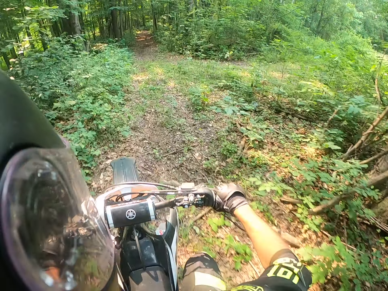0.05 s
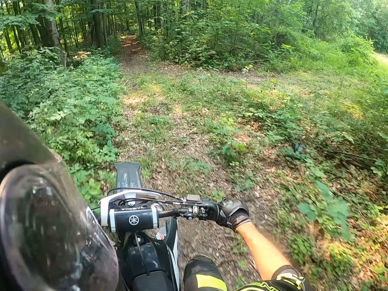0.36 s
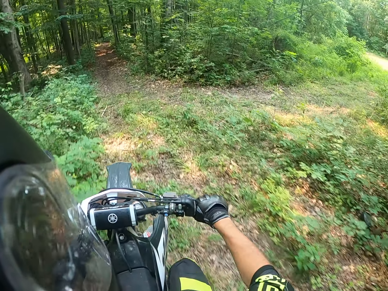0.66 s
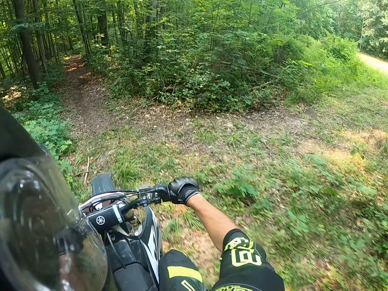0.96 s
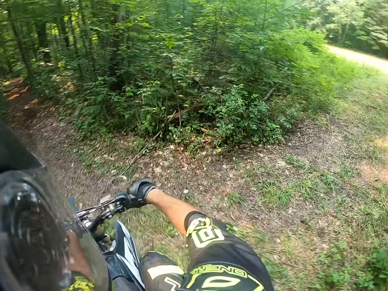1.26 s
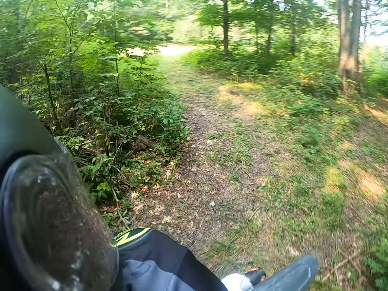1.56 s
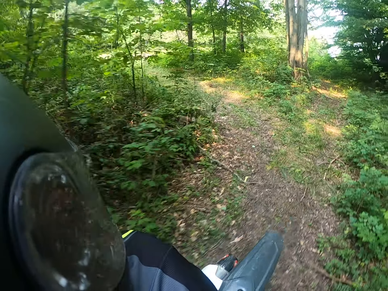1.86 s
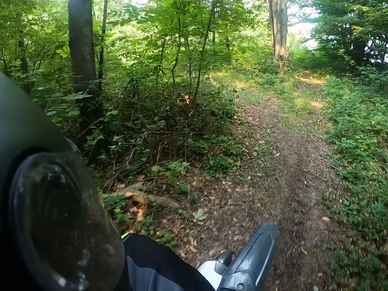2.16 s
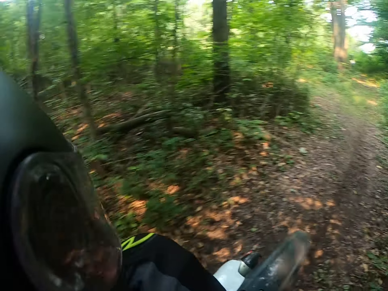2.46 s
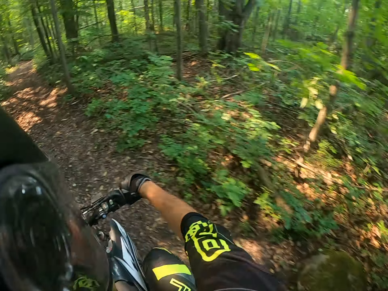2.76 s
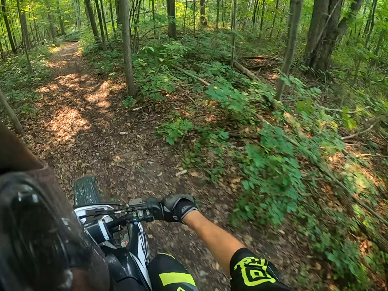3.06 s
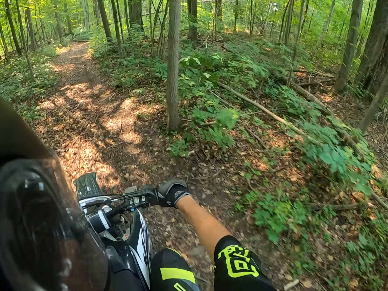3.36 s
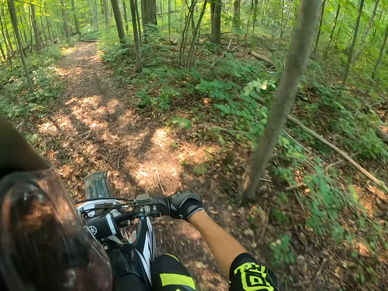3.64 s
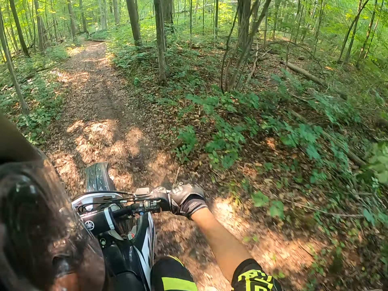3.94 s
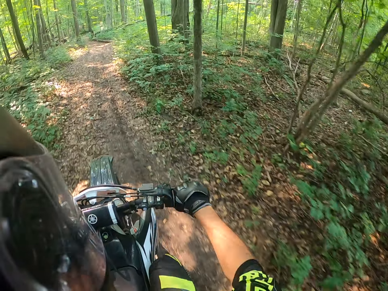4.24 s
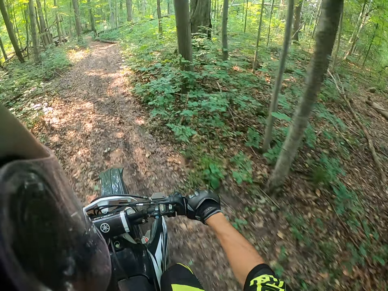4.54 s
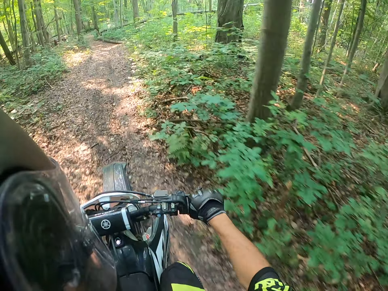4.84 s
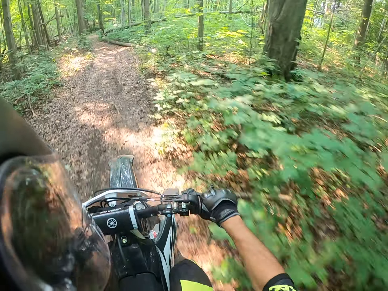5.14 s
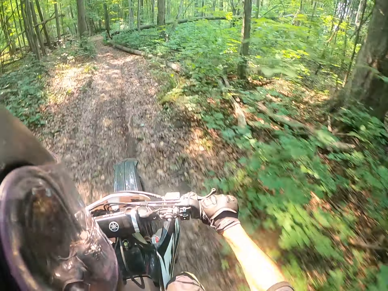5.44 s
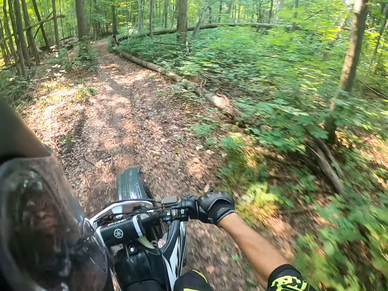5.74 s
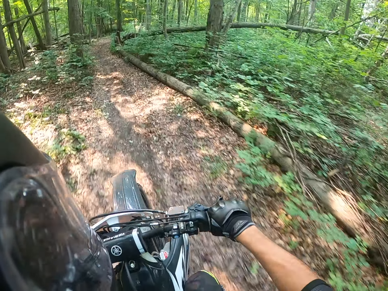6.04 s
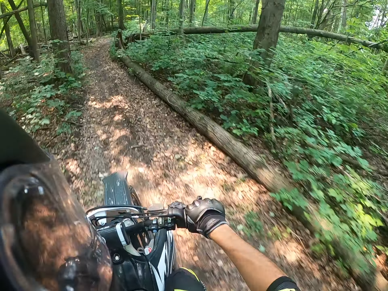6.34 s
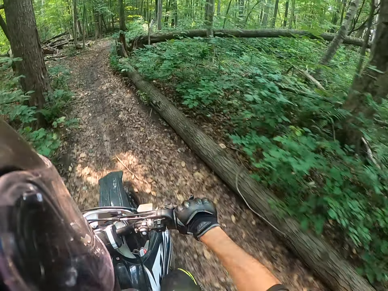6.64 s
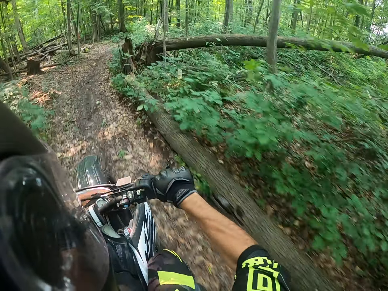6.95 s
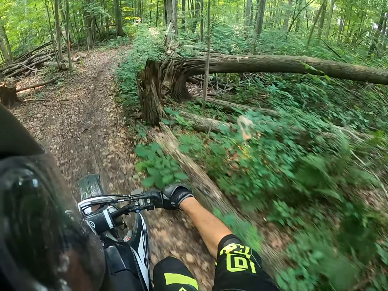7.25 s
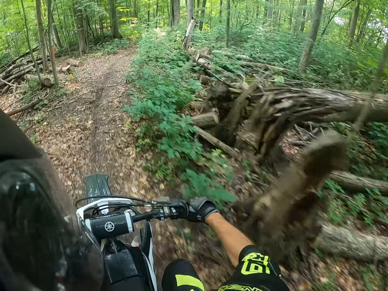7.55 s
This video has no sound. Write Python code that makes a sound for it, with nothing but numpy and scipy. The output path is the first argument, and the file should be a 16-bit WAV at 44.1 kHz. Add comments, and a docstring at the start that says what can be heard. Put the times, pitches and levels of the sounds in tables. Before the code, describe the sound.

A dirt bike engine pulls, drops to a lumpy idle, then revs up twice more, with knocks from a bumpy forest trail.

```python
"""A dirt bike on a forest trail

From the rider's helmet we hear a one-cylinder four-stroke engine pull, drop to a lumpy idle, then pull
twice more. Each firing thumps down the exhaust pipe and barks in the silencer. The engine clatters,
bumps knock the frame, gears whine, tyres crush leaves and slow air buffets the microphone."""
import sys
import numpy as np
from scipy import signal
from scipy.fft import rfft, irfft
from scipy.io import wavfile
from scipy.ndimage import uniform_filter1d

SR = 44100
rng = np.random.default_rng(int(sys.argv[2]) if len(sys.argv) > 2 else 0)


def file_out(sig):
    """Save sig as 16-bit WAV at sys.argv[1]."""
    # one column per channel
    cols = np.atleast_2d(sig).T
    # limit, then scale
    lim = np.clip(cols, -1, 1)
    pcm = np.round(lim * 32767).astype(np.int16)
    wavfile.write(sys.argv[1], SR, pcm)


N = 343980
RING = 4096  # samples in one short ringing sound
IDLE_HZ, MID_HZ = 18.5, 38  # firings a second: the top of idle, and mid speed
# Each time the rider opens the throttle: open_s, shut_s, extra_bark_db, thump_after_shut_db
PULLS = [(-0.03, 1.331, 0, 4.5), (3.647, 5.712, 2, -6), (6.723, 7.324, 1.5, -3)]


def undb(db):
    """Turn decibels into a gain."""
    return 10 ** (np.asarray(db) / 20)


def unit(x):
    """Scale a sound to an average power of 1."""
    return x / np.sqrt(np.mean(x ** 2))


def curves(table):
    """Join rows that start with a time into curves, one value per sample."""
    s, *columns = np.transpose(table)
    return [np.interp(np.arange(N) / SR, s, c) for c in columns]


def response(points, stretch=1):
    """A click of energy 1 with the tone of (pitch_hz, level_db) points; stretch raises its pitch."""
    hz, db = np.transpose(points)
    f = np.maximum(np.arange(RING // 2 + 1) * SR / RING, 1)
    gains = undb(np.interp(np.log(f), np.log(hz * stretch), db))
    cepstrum = irfft(np.log(gains))
    cepstrum[1:RING // 2] *= 2  # this fold packs the energy at the start
    cepstrum[RING // 2 + 1:] = 0
    h = irfft(np.exp(rfft(cepstrum)))
    return h / np.linalg.norm(h)


def ring(modes):
    """Fading tones from (pitch_hz, width_hz, level_db) rows; wider ones die sooner."""
    t = np.arange(RING) / SR
    h = sum(undb(db) * width * np.exp(-np.pi * width * t) * np.sin(2 * np.pi * hz * t)
            for hz, width, db in modes)
    return h / np.linalg.norm(h)


def through(x, h):
    """Let the sound x set off the ringing h."""
    return signal.oaconvolve(x, h)[:len(x)]


def soften(x, hz):
    """Dull a sound by turning down the treble above hz."""
    return signal.sosfilt(signal.butter(2, min(hz, SR / 4), fs=SR, output="sos"), x)


def walk(rate):
    """A random drift of size about 1, with rate turns a second."""
    size = int(SR / rate)
    steps = np.repeat(rng.standard_normal(N // size + 1), size)
    return unit(uniform_filter1d(steps, size)[:N])


def add(out, at, sound):
    """Mix a sound in, starting at a sample."""
    out[at:at + len(sound)] += sound[:max(N - at, 0)]


def burst(decay_s):
    """A dying puff of noise."""
    return rng.standard_normal(RING) * np.exp(-np.arange(RING) / SR / decay_s)


def wrist(open_s=0.13, shut_s=0.031, twist_db=3, twist_s=0.23):
    """The rider opens the throttle (0 to 1), swells the bark with a last twist, then snaps it shut."""
    t = np.arange(N) / SR
    opening, extra_db = np.zeros(N), np.zeros(N)
    for opens, shuts, db, _ in PULLS:
        grip = np.clip((t - opens) / open_s, 0, 1) * np.clip(1 - (t - shuts) / shut_s, 0, 1)
        opening += grip
        extra_db += grip * (db + twist_db * np.exp(-((t - shuts) / twist_s) ** 2))
    return opening, extra_db


def loudness(law, hz, opening):
    """A level in dB that follows engine speed; the throttle blends from coasting to pulling."""
    coasting, pulling = (db + slope * np.log2(hz / MID_HZ) for db, slope in law)
    return coasting + opening * (pulling - coasting)


def rev_dip(hz):
    """The bark dips a little while the engine gains speed, in dB."""
    octaves_per_s = uniform_filter1d(np.gradient(np.log2(hz)) * SR, size=SR // 10)
    return -0.97 * np.clip(octaves_per_s, 0, 2)


def down_pipe(h, reflection, echo_s):
    """The open end of a pipe sends each pulse back upside down."""
    h = h - reflection * np.pad(h, (int(echo_s * SR), 0))[:len(h)]
    return h / np.linalg.norm(h)


def exhaust(firings, hz, db, throttle, stumble_s=2.86, miss_db=-17, scatter_db=0.37, lag_s=0.00029):
    """Each firing thumps down the pipe: shorter at speed, duller with the throttle shut."""
    # The tone of one puff from the exhaust valve: pitch_hz, level_db
    puff_tone = [(30, -15), (70, -6.5), (102, -18), (135, 1), (195, 3), (235, 3.5), (290, 3), (380, 3),
                 (470, -5), (570, -5), (700, -20.5), (1000, -6), (1400, -16), (2100, -52)]
    out = np.zeros(N)
    for k, (at, chance) in enumerate(zip(firings, rng.standard_normal(len(firings)))):
        if hz[at] < IDLE_HZ:
            # every second firing all but fails; the pattern slips once, at the stumble
            missed = (k + int(at / SR > stumble_s)) % 2
            thump = idle_putt(chance) * undb(miss_db * missed)
        else:
            speed = max(hz[at], 26 * throttle[at]) / 36  # an open throttle limits the puff's length
            shut = 1 - throttle[at]
            stretch = speed ** (0.29 + 0.39 * shut) * (1 - 0.1 * shut)
            puff = soften(response(puff_tone, stretch), 470 * speed + 2200 * throttle[at] ** 2)
            # hotter gas at speed brings the echo back sooner
            thump = down_pipe(puff, reflection=0.87, echo_s=0.003114 / speed ** 0.19)
        gain = np.sqrt(SR / hz[at]) * undb(db[at] + scatter_db * chance)
        add(out, at + int(lag_s * SR), thump * gain)  # just behind the bark
    # the exhaust chamber delays the lows, so each pop sweeps downward
    return out - 2 * signal.lfilter(*signal.iirpeak(230, 1, fs=SR), out)


def bark(firings, hz, cycle, db, push_db, throttle, scatter_db=1.4, jitter_s=0.00005):
    """With the throttle open, each firing strikes the silencer and a rush of gas follows."""
    # The silencer's ringing tones: pitch_hz, width_hz, level_db
    silencer_tones = [(1084, 27.2, 4.5), (1335, 40, -3.5), (1367, 65, -13.5), (1676, 13, -21),
                      (3060, 59, -22.5), (3290, 120, -23.5)]
    # The tone of rushing gas: pitch_hz, level_db
    gas_tone = [(120, -25), (200, -25.5), (330, -26.5), (490, -22.5), (640, -28), (900, -7.5),
                (1000, -14.5), (1075, -15), (1200, -9), (1345, 5.5), (1540, -22), (1680, 1.5), (1850, -5),
                (2050, -35), (4000, -61)]

    def piped(pitch_hz, width_hz):
        """One softened tone with its echo in the pipe."""
        return down_pipe(soften(ring([(pitch_hz, width_hz, 0)]), 1500), reflection=0.48, echo_s=0.003367)

    strength, lateness = rng.standard_normal((len(firings), 2)).T
    starts = np.clip(firings + np.round(lateness * jitter_s * SR).astype(int), 0, N - 1)
    blows = np.zeros(N)
    blows[starts] = np.sqrt(SR / hz[firings]) * undb(scatter_db * strength)
    drive = undb(db - 1)
    blows *= -throttle * drive
    lowest, *upper = (undb(level) * piped(pitch, width) for pitch, width, level in silencer_tones)
    # faster blows are sharper and ring the upper tones more
    out = through(blows, lowest) + through(blows * hz / MID_HZ, sum(upper))
    # a hard push sharpens the front of each bark
    out += through(blows * undb(-10 + 1.2 * push_db), piped(1190, 230))
    pulsing = unit(0.15 + np.exp(-cycle / 0.28))  # some gas still flows between firings
    rush = rng.standard_normal(N) * pulsing * undb(-6) * np.sqrt(throttle) * drive
    return out + soften(through(rush, response(gas_tone)), 5200)


def forest(x, echo_db=-6, decay_s=0.053, delay_s=0.00489):
    """Ground, trunks and the rider's body scatter each pulse into a short, dull tail."""
    tail = soften(np.pad(burst(decay_s), (int(delay_s * SR), 0)), 2700)
    # low sounds pass round the trunks
    tail = signal.sosfilt(signal.butter(4, 290, "high", fs=SR, output="sos"), tail)
    return x + through(x, tail) * undb(echo_db) / np.sqrt(decay_s * SR / 2)


def clatter(cycles, bark_db, clatter_db, throttle, grain_db=1.0, flicker_db=0.94):
    """Valves, gears and chain make many tiny taps that ring the engine's casing and cooling fins."""
    # The tone of the casing: pitch_hz, level_db
    casing_tone = [(60, -12), (150, -2), (310, -8), (490, -3), (660, -4.5), (980, -3), (1075, 12.5),
                   (1200, -8.5), (1360, 6), (1560, -8), (1700, -4.5), (1850, -6), (2100, -29), (3500, -55)]
    # The brighter tone of the fins: pitch_hz, level_db
    fin_tone = [(1200, 4), (2000, -4), (2390, -2), (2760, -10), (2930, -2.5), (3050, 3.5), (3170, -1),
                (3330, -0.5), (3550, -6), (3900, -11), (4300, -13.5), (4510, -5.5), (4800, -15.5),
                (6750, -20.5), (7800, -32.5), (9600, -28.5), (15000, -53)]
    bunch = 1 + 0.092 * np.cos(2 * np.pi * 2 * cycles - 1.5)  # the crank turns twice per firing
    casing_taps, fin_taps = (
        unit(rng.standard_normal(N) * bunch * undb(grain_db * walk(500) + flicker_db * walk(25)))
        for _ in range(2))
    share = np.sqrt(1 - 0.97 * throttle)  # the casing fades as the throttle opens
    casing = through(casing_taps * share * undb(bark_db - 1), response(casing_tone))
    fins = through(fin_taps * undb(clatter_db + 2), response(fin_tone))
    return soften(casing, 7800) + fins


def wind(flutter_hz=28, breeze_db=-39.5, sway_db=-2.5, eddy_db=-9):
    """Air hits the microphone: a swaying breeze, and gusts that swell into a low, wandering flutter."""
    # Gusts of air: middle_s, length_s, level_db
    gust_list = [(0.368, 0.19, -30), (1.54, 0.35, -32), (1.926, 0.29, -30.5), (2.326, 0.11, -31),
                 (2.59, 0.1, -27), (4.734, 0.22, -30.5), (5.422, 0.086, -31), (6.045, 0.17, -23)]
    # The tone of the wind's rumble: pitch_hz, level_db
    rumble_tone = [(10, -9), (20, 1), (28, 5), (37, -10.5), (60, -8), (110, -22), (300, -79.5)]
    t = np.arange(N) / SR
    gusts = np.sqrt(sum(undb(db) ** 2 * np.exp(-(2 * (t - s) / length) ** 2)
                        for s, length, db in gust_list))
    breeze = undb(breeze_db + sway_db * walk(4))
    pitch_hz = flutter_hz * (1 + 0.131 * walk(30))
    flutter = np.sqrt(2) * np.sin(2 * np.pi * np.cumsum(pitch_hz) / SR)
    rumble = through(rng.standard_normal(N), response(rumble_tone))
    return gusts * flutter + rumble * np.hypot(breeze, gusts * undb(eddy_db))


def run_on(fade_s=0.23):
    """Fuel left after the throttle shuts makes the thump briefly louder or softer, in dB."""
    t = np.arange(N) / SR
    return sum(db * (t > shuts) * np.exp(-((t - shuts) / fade_s) ** 2) for _, shuts, _, db in PULLS)


def knocks():
    """Bumps and chain snatches ring the frame, hard ones with a crack on top; the slack chain clinks on its
    guide."""
    # Hits on the frame: bumps in the trail, and from 1.57 to 1.69 s the chain snatching on each firing:
    # start_s, level_db, treble_db, sharpness_hz
    hits = [(1.532, -21, -2.5, 885), (1.57, -17.5, -14, 1300), (1.61, -17.5, -16, 1300),
            (1.65, -25, -8, 1300), (1.685, -17, -32, 1290), (1.986, -24, 12.5, 2600),
            (2.145, -30, -20, 1500), (2.776, -23, -30, 1500), (2.868, -20.5, -26, 625),
            (2.879, -23, -26, 524), (5.867, -18.5, -4, 2500), (5.891, -17.5, -21, 500),
            (5.913, -11.5, -29, 800), (5.987, -17, -25, 750), (6.038, -18, -27, 1200),
            (6.436, -14.5, -28, 1110)]
    # The frame's ringing tones: pitch_hz, width_hz, level_db
    frame_tones = [(570, 23, 10), (657, 14, 4.5), (840, 28, -5), (920, 14, 14), (1136, 26, 18),
                   (1230, 35, -1), (1550, 63, 10.5), (1660, 37, -1.5), (2370, 51, -4)]
    # The tone of a hard hit: pitch_hz, level_db
    crack_tone = [(500, -8), (1600, 0.5), (1950, -12), (2300, -8), (2900, -24), (3700, -5.5), (4400, -15.5),
                  (5200, -15), (6300, -18), (7500, -47), (12000, -34), (15000, -53)]
    # Slaps of the chain: start_s, level_db, pitch_hz
    chain_slaps = [(1.411, -28, 3550), (1.468, -31, 3620), (1.532, -42, 3700), (1.57, -37, 5000),
                   (1.647, -39, 5060), (1.78, -37, 3620), (1.81, -36, 3680), (1.859, -38, 3700),
                   (1.926, -42, 3650), (2.029, -39, 4100), (2.605, -33.5, 3600), (3.502, -36, 3680),
                   (5.872, -31, 3840)]
    out = np.zeros(N)
    for s, db, treble_db, sharpness_hz in hits:
        body = soften(ring(frame_tones), sharpness_hz)
        crack = through(burst(decay_s=0.0063), response(crack_tone))
        add(out, int(s * SR), body / abs(body).max() * undb(db))
        add(out, int(s * SR), crack / abs(crack).max() * undb(db + treble_db - 2))
    for s, db, hz in chain_slaps:
        slap = soften(through(burst(decay_s=0.0086), ring([(hz, 180, 0)])), 5000)
        add(out, int(s * SR), slap / abs(slap).max() * undb(db - 4))
    return out


def idle_putt(chance, detune=0.016, scatter_db=-1.2):
    """One idle firing rings the pipe; uneven burning shifts its pitch and level."""
    # The pipe's ringing tones at idle: pitch_hz, width_hz, level_db
    pipe_tones = [(154, 17, -9.5), (227, 25, 1.5), (410, 58, -11), (471, 19, -4.5), (616, 97, -13),
                  (806, 85, -13)]
    putt = ring([(hz * (1 + detune * chance), width, db) for hz, width, db in pipe_tones])
    return soften(putt, 510) * np.sqrt(2) * undb(scatter_db * chance)


def tyres(grain_db=4):
    """Dry leaves crackle under the knobbly tyres."""
    # How loud the leaves are: time_s, level_db
    leaf_levels = [(0, -72), (2.4, -61), (2.9, -56), (3.5, -55), (4.0, -50.5), (5.0, -53), (7.8, -75)]
    # Their tone: pitch_hz, level_db
    leaf_tone = [(2000, -5.5), (4000, -1), (5400, -3), (6800, -11.5), (8000, -26.5), (11000, -30.5),
                 (15000, -26)]
    db, = curves(leaf_levels)
    crackle = unit(rng.standard_normal(N) * undb(grain_db * walk(900)))
    return through(crackle * undb(db), response(leaf_tone))


def whine(table, width_hz):
    """A rough tone that follows (time_s, pitch_hz, level_db) rows and is silent outside them."""
    hz, db = curves(table)
    t = np.arange(N) / SR
    phase = 2 * np.pi * np.cumsum(hz) / SR
    sounding = (t > table[0][0]) & (t < table[-1][0])
    return sounding * undb(db) * (walk(width_hz) * np.cos(phase) + walk(width_hz) * np.sin(phase))


def rolling():
    """As the bike rolls at idle, the gears whine lower as it slows and a brake pad sings faintly."""
    # The gears' whine: time_s, pitch_hz, level_db
    gears = [(2.45, 1450, -67), (2.65, 1437, -53), (2.93, 1408, -47), (3.3, 1314, -51), (3.55, 1308, -46.5),
             (3.7, 1310, -58)]
    # The brake pad's note: time_s, pitch_hz, level_db
    brake = [(2.8, 3240, -68), (2.92, 3230, -55), (3.2, 3350, -65), (3.55, 3280, -73)]
    return whine(gears, width_hz=70) + whine(brake, width_hz=35)


def scene(idle_thump_db=-39, coast_flow=0.15):
    """Engine speed times the firings and sets their level; the throttle turns a burble into a bark."""
    # Engine speed: time_s, firings_per_s
    speed = [(0.0, 17.54), (0.12, 28.66), (0.44, 40.99), (0.81, 33.67), (1.03, 33.77), (1.35, 38.71),
             (1.66, 23.96), (2.08, 17.04), (3.64, 17.08), (4.02, 38.21), (4.43, 30.98), (4.76, 33.3),
             (4.86, 36.26), (5.43, 42.5), (5.64, 49.85), (5.71, 56.98), (5.87, 41.09), (6.24, 38.29),
             (6.62, 32.7), (6.84, 40.85), (7.04, 41.32), (7.31, 48.92), (7.57, 34.5), (7.8, 37.39)]
    # Loudness of thump, bark and clatter, coasting then pulling: mid_speed_db, db_per_speed_doubling
    thump_law = [(-31, 11.5), (-27.5, -1.5)]
    bark_law = [(-30.5, 8.47), (-32, 7.5)]
    clatter_law = [(-41.5, 6.46), (-38, 5.9)]
    hz, = curves(speed)
    opening, extra_db = wrist()
    # some gas gets past even a shut throttle
    throttle = np.clip(opening + (1 - opening) * coast_flow * (hz / MID_HZ) ** 2, 0, 1)
    thump_db = np.where(hz < IDLE_HZ, idle_thump_db, loudness(thump_law, hz, opening) + run_on())
    push_db = extra_db + opening * rev_dip(hz)
    bark_db = loudness(bark_law, hz, opening) + push_db
    clatter_db = loudness(clatter_law, hz, opening)
    cycles = np.cumsum(hz) / SR
    firings = np.flatnonzero(np.diff(np.floor(cycles))) + 1  # one at each whole cycle
    thumps = exhaust(firings, hz, thump_db, throttle)
    barks = bark(firings, hz, cycles % 1, bark_db, push_db, throttle)
    engine = forest(thumps + barks) + clatter(cycles, bark_db, clatter_db, throttle)
    return (engine + knocks() + rolling() + tyres() + wind())[None]


def record(dry, top_hz=14500):
    """The helmet camera cuts the highest treble."""
    return signal.sosfilt(signal.ellip(8, 0.2, 70, top_hz, fs=SR, output="sos"), dry)


dry = scene()
out = record(dry)
file_out(out)
```